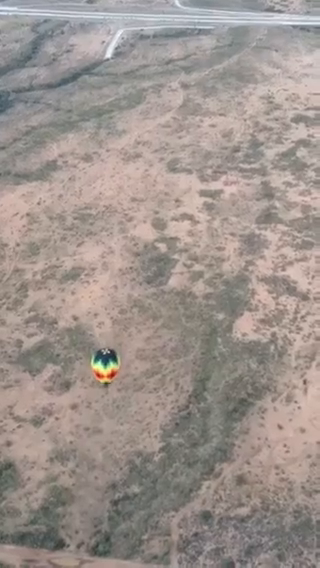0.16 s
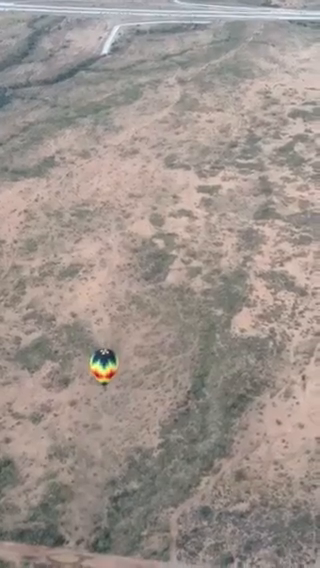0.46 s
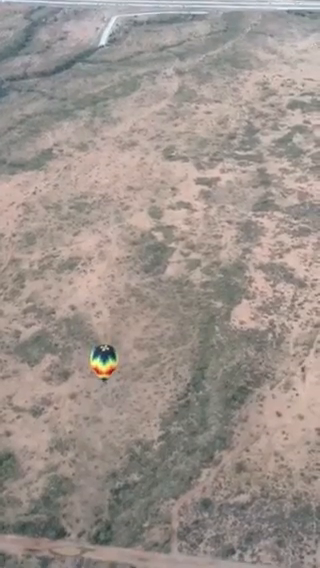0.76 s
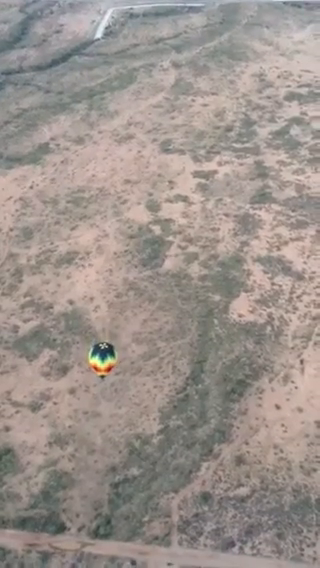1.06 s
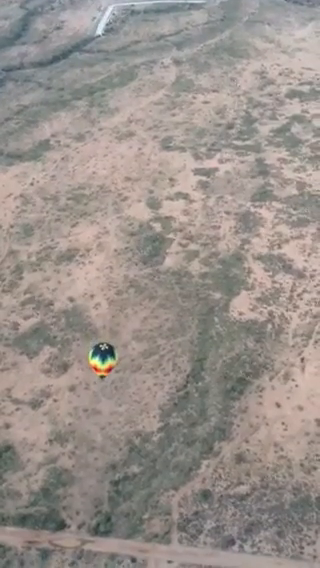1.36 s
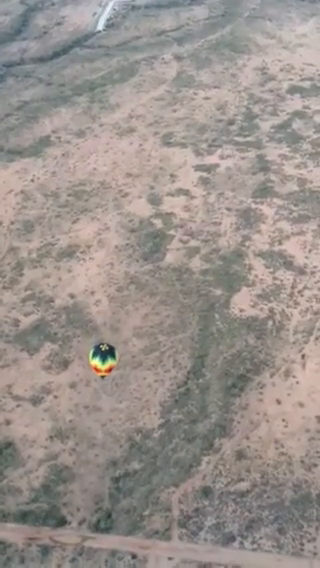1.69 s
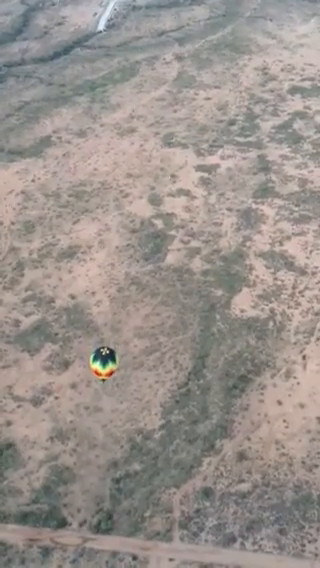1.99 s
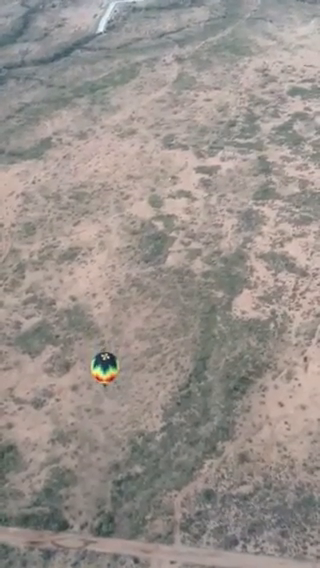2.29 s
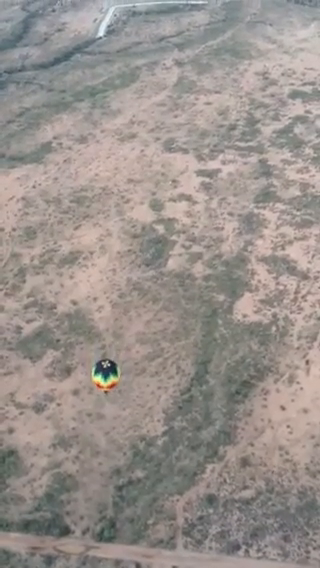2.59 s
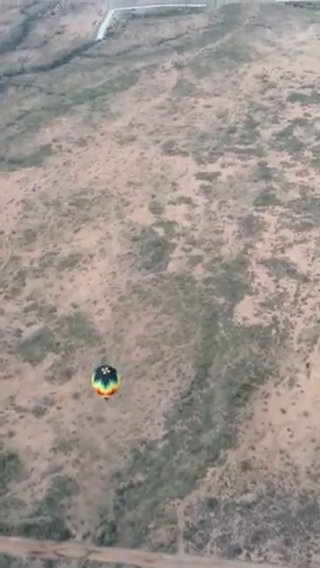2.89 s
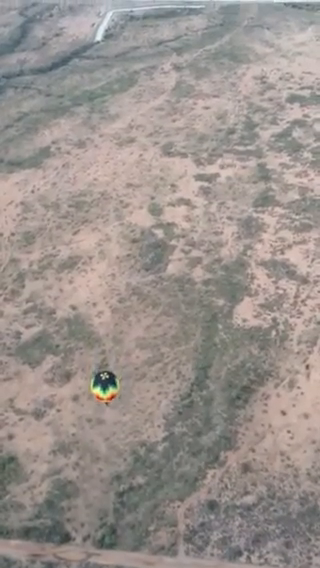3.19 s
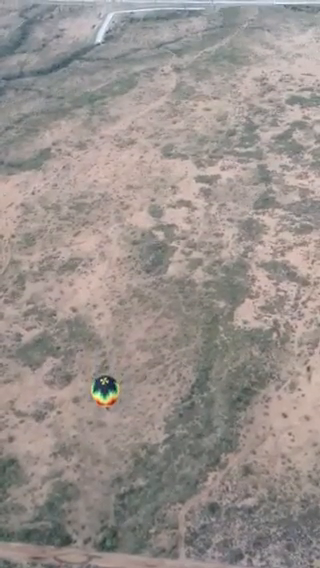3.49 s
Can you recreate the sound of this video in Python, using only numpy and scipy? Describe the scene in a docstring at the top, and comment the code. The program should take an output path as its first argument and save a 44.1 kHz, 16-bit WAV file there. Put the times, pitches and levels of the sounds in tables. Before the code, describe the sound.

Close, dry outdoor capture of a propane burner: near silence with a faint hum, sudden ignition, steady gas hiss over a lumpy bass roar with puffs, hiss thinning, quick stop and tiny valve tick.

```python
"""In the open air, close by a hot air balloon: its propane burner fires one three-second blast.
Quiet air, a thin pilot hiss and a faint hum run throughout, all made of shaped noise and sine tones.
The gas jet hisses as drifting noise, lights with a thump and feeds a lumpy, bass-heavy roar with puffs.
The hiss thins out, the flame dies and the valve ticks with a fuzzy ring of its metal.
The strongest puffs make the recorder's limiter duck for a moment; both channels are the same."""
import sys
import numpy as np
from scipy import signal
from scipy.fft import rfft, irfft
from scipy.io import wavfile
from scipy.ndimage import uniform_filter1d, minimum_filter1d

SR = 44100
rng = np.random.default_rng(int(sys.argv[2]) if len(sys.argv) > 2 else 0)


def unload_audio(sound):
    """Save the sound as a 16-bit wav file, at the path given as the first command line argument."""
    columns = np.transpose(np.atleast_2d(sound))
    # keep every value between -1 and 1, then stretch to whole-number steps
    steps = np.round(np.clip(columns, -1, 1) * 32767)
    wavfile.write(sys.argv[1], SR, steps.astype(np.int16))


N = 158760  # samples, 3.6 s
T = np.arange(N) / SR  # s
HZ = np.fft.rfftfreq(N, 1 / SR)

# All levels are ahead of the recorder; every colour is a relative spectrum.
# quiet air around the basket, colour: pitch_hz, level_db (per Hz)
AIR_COLOUR = [(30, -22), (80, -2), (125, 5), (185, 6), (270, -3), (370, -11.5), (560, -7.5), (900, -12),
              (1350, -33), (2300, -29), (6500, -40), (15000, -48.5)]
# quiet air: time_s, level_db
AIR_LEVEL = [(0, -52), (.19, -49), (3.4, -51.5), (3.6, -55)]
# narrow hisses of the pilot flame, colour: pitch_hz, level_db (per Hz)
PILOT_COLOUR = [(1400, -23), (1700, -8), (1880, 0), (2100, -11), (2900, -21), (3250, -4), (3450, -3),
                (3650, 3), (3900, -6), (4300, -5), (5000, -16), (6800, -22), (7550, -12.5), (8500, -20),
                (15000, -22)]
# pilot flame: time_s, level_db
PILOT_LEVEL = [(0, -61), (.2, -59), (3.4, -67), (3.6, -66)]
# faint background hum, perhaps a far engine: time_s, pitch_hz, level_db
HUM = [(0, 137.4, -57), (0.199, 136.6, -54), (3.401, 146, -56.5), (3.6, 146, -54)]
# harmonics of the hum: multiple (of pitch_hz), level_db (relative)
HUM_HARMONICS = [(2, 3.5), (3, -4.5), (4, -7), (5, -10.5)]

# hiss of the gas jet: time_s, level_db
JET_LEVEL = [(.188, -75), (.194, -38), (.215, -29), (.25, -19.5), (.285, -16.5), (.45, -19.5), (.73, -15),
             (1.08, -17), (1.3, -20), (1.5, -17.5), (2.3, -16.5), (2.65, -18.5), (2.88, -21), (2.95, -24),
             (3.16, -27), (3.27, -34.5), (3.32, -50), (3.37, -67)]
# jet colour at full flow: pitch_hz, level_db (per Hz)
JET_OPEN_COLOUR = [(300, -44), (1500, -6.5), (2300, -5.5), (3300, -6.5), (3800, -2), (4400, -0.5),
                   (5100, -3), (5650, -8), (6500, -2.5), (6900, -3.5), (7600, 0.5), (9700, 0), (11500, 1),
                   (14100, -1.5), (15300, -1.5)]
# jet colour as the valve closes: pitch_hz, level_db (per Hz)
JET_LOW_COLOUR = [(300, -25), (1500, -19), (2400, -7), (3300, -8), (4300, -1), (5000, -3.5), (5500, -7.5),
                  (6700, -4), (7800, -1.5), (11000, -2), (14500, -2.5)]
THIN_FROM_S, THIN_TO_S = 2.4, 3.1
HISS_FLUTTER_DB, HISS_PATCH_DB = 0.3, 0.75

# roar of the flame: time_s, level_db
FLAME_LEVEL = [(.192, -57), (.206, -15.5), (.24, -16.5), (.3, -12.5), (.68, -8.5), (.9, -8.5), (1.2, -14),
               (1.6, -14.5), (2.3, -13.5), (2.65, -12), (2.88, -13), (3.08, -16.5), (3.28, -18),
               (3.33, -26.5), (3.36, -35), (3.43, -45), (3.47, -64)]
# flame colour: pitch_hz, level_db (per Hz)
FLAME_COLOUR = [(25, -31), (60, -19), (100, -11.5), (155, 0.5), (225, 1.75), (290, -1), (370, -6.5),
                (463, -10), (585, -9), (690, -17), (880, -16), (1020, -19), (1310, -15.5), (1500, -22),
                (1750, -27.5), (2600, -30), (5000, -33), (15000, -56)]
ROAR_LUMP_DB, ROAR_PATCH_DB, LUMP_HZ = 1, 0.5, 45
# rush of the flame above the bass: time_s, level_db (relative to the roar)
RUSH_LEVEL = [(.21, 0.44), (.28, 2.5), (.45, -3), (1.5, -0.5), (2.4, -2), (3.15, 1.9), (3.3, -2),
              (3.4, -7.5)]
# how the rush follows the lumps of the roar (slightly against them), and its own flicker
RUSH_FROM_HZ, RUSH_LUMP_DB, RUSH_FLICKER_DB, FLICKER_HZ = 265, -0.2, .5, 30

# puffs of the flame, the first being the ignition:
# centre_s, thump_db, push_db (slow push of air), push_s (half length of the push, to 1/e)
PUFFS = [(.219, -1.5, -18, .004), (.376, -5.5, -13, .006), (.462, -16, -15, .012), (.821, -2.5, -6.5, .006),
         (.979, -8, -30, .012), (1.214, -13, -8, .016), (1.357, -8.5, -30, .012), (1.571, -8, -12, .01),
         (1.707, -10, -30, .012), (2.057, -9, -9, .015), (2.339, -15, -6.5, .018), (2.649, -10, -26, .012),
         (2.887, -10, -8, .014), (3.289, -16, -40, .012)]
THUMP_HZ, THUMP_HALF_S = 210, .007
LULL_DB, LULL_AFTER_S, LULL_HALF_S = -12, .026, .019

# spit of gas in the valve tick, colour: pitch_hz, level_db (per Hz)
TICK_COLOUR = [(1000, -28), (4000, -1), (7000, -1), (12000, 0), (15000, -6)]
TICK_S, TICK_DB, TICK_RISE_S, TICK_T60_S = 3.439, -53, .003, 0.12
# ring of the valve seat: pitch_hz, level_db, t60_s
SEAT_MODES = [(3760, -62, .3), (5680, -68, .12), (7650, -63, .2), (10050, -65, .15), (11800, -65, .14),
              (14500, -65, .12)]
SEAT_WIDTH_HZ = 130  # to either side of each pitch, where the amplitude is half

# recorder
LIMIT_DB, RECOVER_DB_PER_S, LOW_CUT_HZ, EDGE_HZ = -1.4, 24.5, 137, 15450


def amp(db):
    """Decibels to gain."""
    return 10 ** (np.asarray(db) / 20)


def evened(x):
    """Scales to rms 1."""
    return x / np.sqrt(np.mean(x ** 2) + 1e-20)


def curve(points):
    """Joins (time_s, value) points over the whole scene."""
    return np.interp(T, *np.transpose(points))


def coloured(x, points):
    """Gives x a spectrum of (pitch_hz, level_db) points on a log pitch scale, at rms 1."""
    hz, db = np.transpose(points)
    colour_db = np.interp(np.log(HZ + 1), np.log(hz), db)
    return evened(irfft(rfft(x) * amp(colour_db), N))


def above(x, hz, order=4):
    """The part of x above hz."""
    return irfft(rfft(x) * (1 - 1 / (1 + (HZ / hz) ** order)), N)


def wander(rate_hz):
    """Random motion of rms 1, fading out gently above the given rate."""
    spectrum = rfft(rng.standard_normal(N))
    return evened(irfft(spectrum * (HZ > 2) / (1 + (HZ / rate_hz) ** 2), N))


def turbulence(patch_db, size):
    """Noise whose level drifts in patches of (bins, frames)."""
    cells = signal.stft(rng.standard_normal(N), nperseg=512, noverlap=384)[2]
    patches = uniform_filter1d(rng.standard_normal(cells.shape), size[0], axis=0)
    patches = evened(uniform_filter1d(patches, size[1], axis=1))
    return signal.istft(cells * amp(patch_db * patches), nperseg=512, noverlap=384)[1][:N]


def background():
    """Quiet air and the pilot flame's thin hiss are shaped noise; the faint hum is unsteady harmonics."""
    air = amp(curve(AIR_LEVEL)) * coloured(rng.standard_normal(N), AIR_COLOUR)
    pilot = amp(curve(PILOT_LEVEL)) * coloured(rng.standard_normal(N), PILOT_COLOUR)
    time_s, pitch_hz, level_db = np.transpose(HUM)
    hum_hz = np.interp(T, time_s, pitch_hz) * (1 + .004 * wander(rate_hz=10))
    turns = np.cumsum(hum_hz) / SR
    hum = 0
    for multiple, db in HUM_HARMONICS:
        hum = hum + amp(db) * np.sin(2 * np.pi * (round(multiple) * turns + rng.random()))
    return air + pilot + amp(np.interp(T, time_s, level_db)) * evened(hum)


def jet():
    """Gas hisses from the nozzles and loses treble as the flow drops."""
    gas = turbulence(HISS_PATCH_DB, size=(14, 16))
    thin = np.clip((T - THIN_FROM_S) / (THIN_TO_S - THIN_FROM_S), 0, 1)
    hiss = (1 - thin) * coloured(gas, JET_OPEN_COLOUR) + thin * coloured(gas, JET_LOW_COLOUR)
    return hiss * amp(curve(JET_LEVEL) + HISS_FLUTTER_DB * wander(rate_hz=19))


def lulls():
    """The bass of the roar sinks briefly after a puff, the more the harder it thumped (dB)."""
    depth = np.zeros(N)
    for centre_s, thump_db, _, _ in PUFFS:
        t = T - centre_s - LULL_AFTER_S
        depth += amp(thump_db) ** 2 * np.exp(-(t / LULL_HALF_S) ** 2)
    return LULL_DB * depth


def flame():
    """Turbulent burning: a lumpy bass roar with a rush above it."""
    burn = coloured(turbulence(ROAR_PATCH_DB, size=(5, 7)), FLAME_COLOUR)
    rush = above(burn, RUSH_FROM_HZ)
    lumps = wander(LUMP_HZ)
    bass = (burn - rush) * amp(ROAR_LUMP_DB * lumps + lulls())
    rush_db = curve(RUSH_LEVEL) + RUSH_LUMP_DB * lumps + RUSH_FLICKER_DB * wander(FLICKER_HZ)
    return amp(curve(FLAME_LEVEL)) * (bass + rush * amp(rush_db))


def puffs():
    """Pockets of gas flare up: each is a thump of a few cycles on one slow push of air."""
    out = np.zeros(N)
    for centre_s, thump_db, push_db, push_s in PUFFS:
        t = T - centre_s
        out += amp(thump_db) * np.exp(-(t / THUMP_HALF_S) ** 2) * np.sin(-2 * np.pi * THUMP_HZ * t)
        out -= amp(push_db) * np.exp(-(t / push_s) ** 2)
    return out


def valve():
    """The valve seats with a small spit of gas and a brief, fuzzy ring of its metal."""
    t = np.maximum(T - TICK_S, 0)
    spit = amp(TICK_DB - 60 * t / TICK_T60_S) * coloured(rng.standard_normal(N), TICK_COLOUR)
    ring = 0
    for pitch_hz, level_db, t60_s in SEAT_MODES:
        resonance = 1 / (1 + ((HZ - pitch_hz) / SEAT_WIDTH_HZ) ** 2)
        mode = evened(irfft(rfft(rng.standard_normal(N)) * resonance, N))
        ring = ring + amp(level_db - 60 * t / t60_s) * mode
    return np.minimum(t / TICK_RISE_S, 1) * (spit + ring)


def scene():
    """All sources summed in the open, with no room, alike in both channels."""
    mono = background() + jet() + flame() + puffs() + valve()
    return np.array([mono, mono])


def record(dry):
    """Low cut against wind, slow-recovering peak limiter that also hears the deep pushes, band limit."""
    low_cut = signal.butter(2, LOW_CUT_HZ, "high", fs=SR, output="sos")
    cut = signal.sosfilt(low_cut, dry)
    peak = np.maximum(abs(dry), abs(cut)).max(0)
    over_db = np.maximum(20 * np.log10(peak + 1e-9) - LIMIT_DB, 0)
    # hold each overshoot and let it recover at a steady rate
    fall_db = T * RECOVER_DB_PER_S
    held_db = np.maximum.accumulate(over_db + fall_db) - fall_db
    # widen to the local maximum, then smooth, so the ducking begins just ahead of the peak
    widened_db = -minimum_filter1d(-held_db, size=160)
    duck_db = uniform_filter1d(widened_db, size=160)
    band_limit = signal.firwin(1023, EDGE_HZ, window=("kaiser", 9), fs=SR)
    return signal.oaconvolve(cut / amp(duck_db), band_limit[None], "same")


dry = scene()
out = record(dry)
unload_audio(out)
```